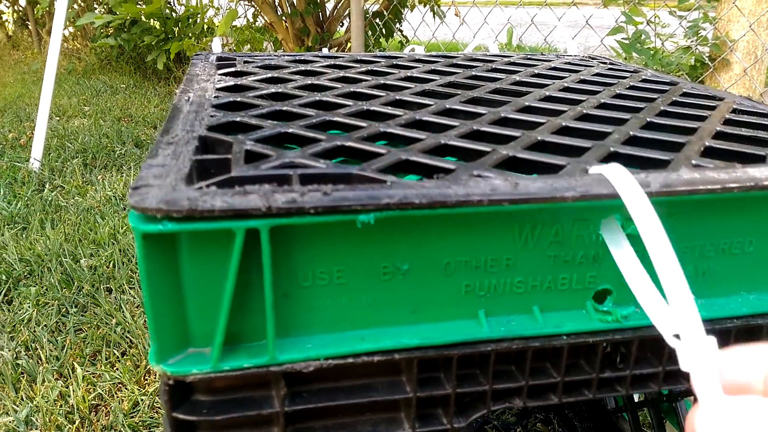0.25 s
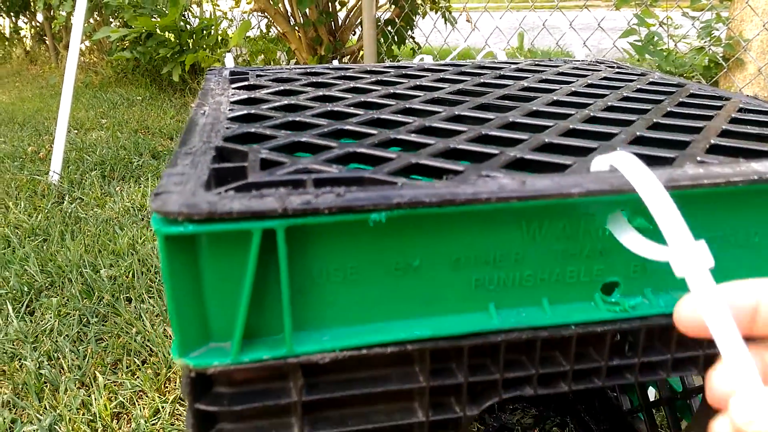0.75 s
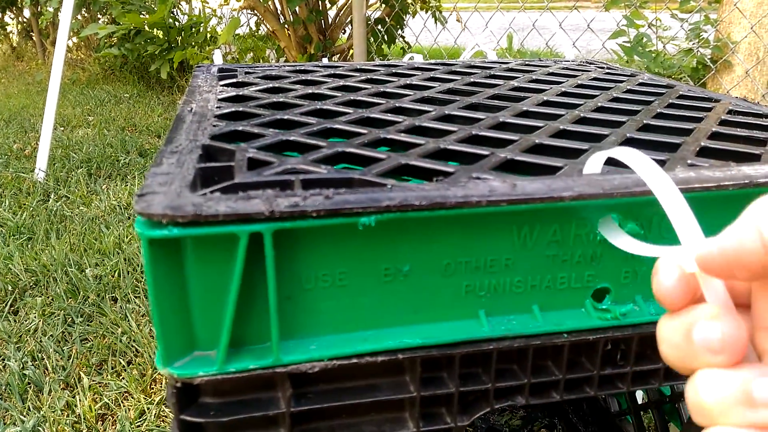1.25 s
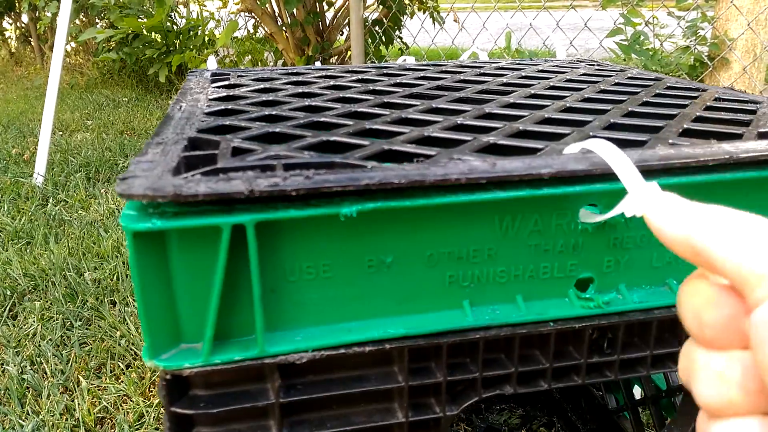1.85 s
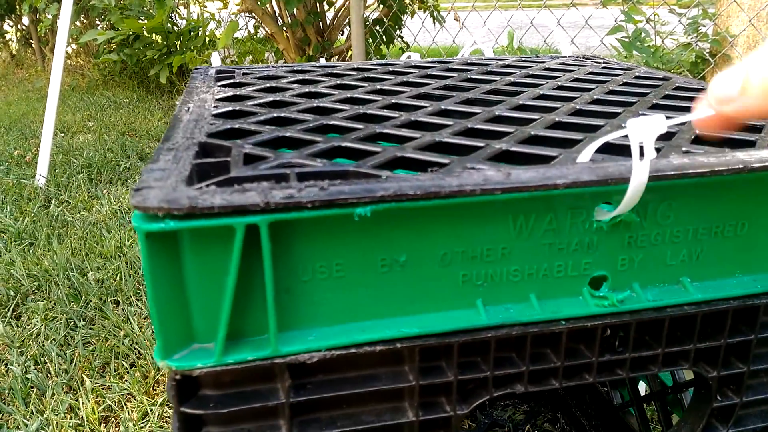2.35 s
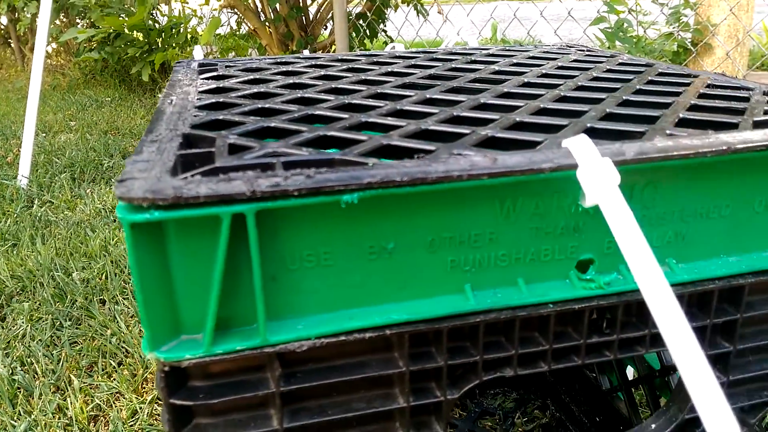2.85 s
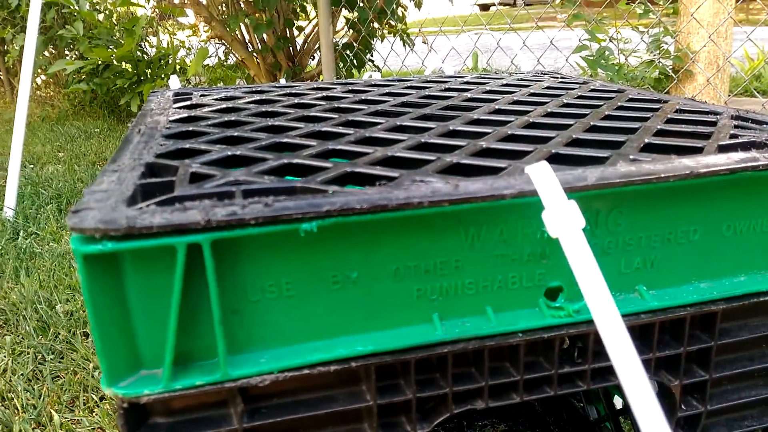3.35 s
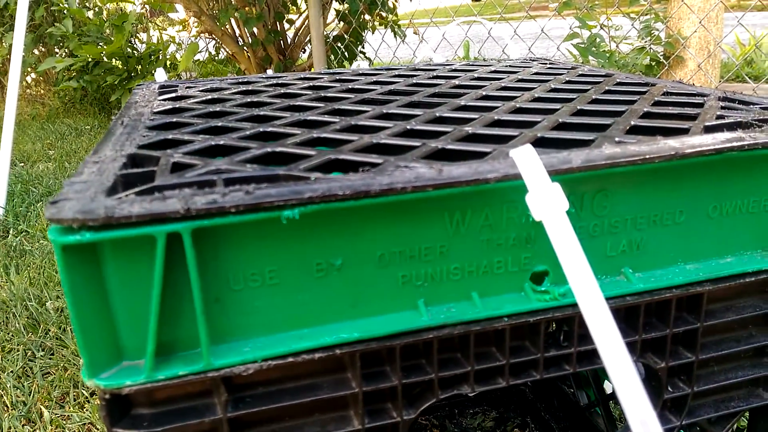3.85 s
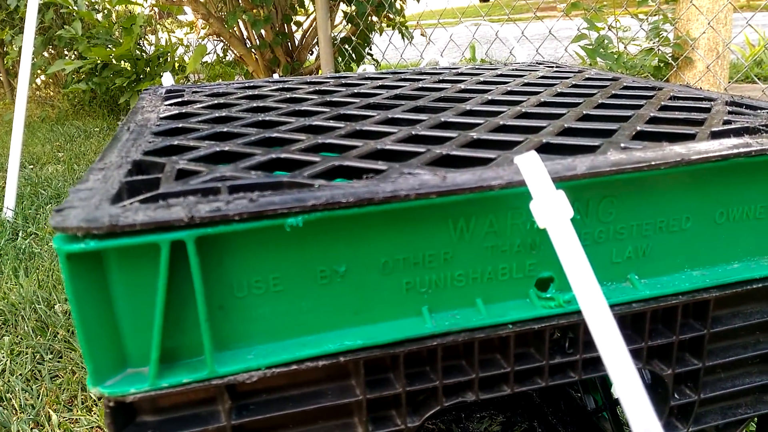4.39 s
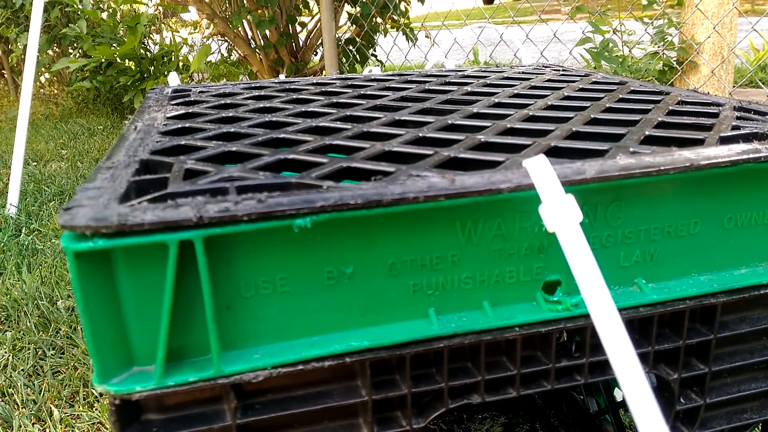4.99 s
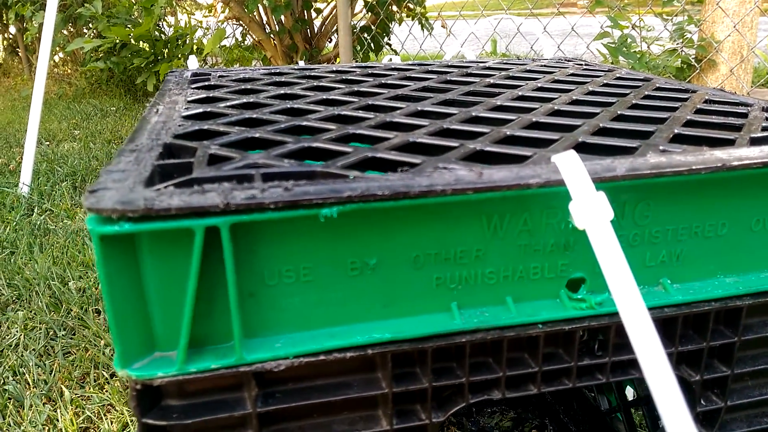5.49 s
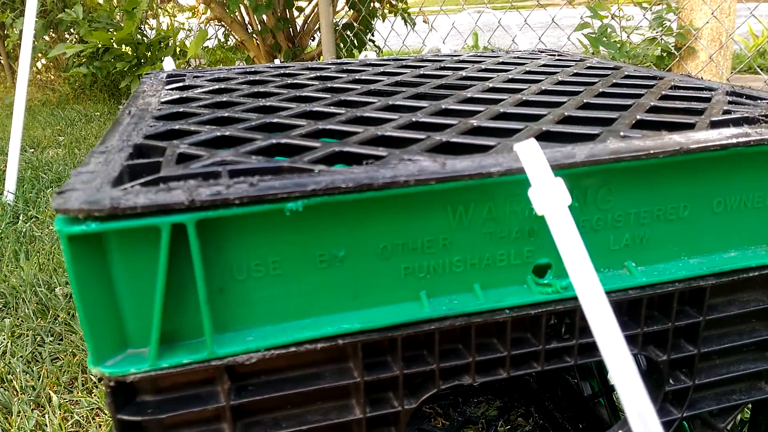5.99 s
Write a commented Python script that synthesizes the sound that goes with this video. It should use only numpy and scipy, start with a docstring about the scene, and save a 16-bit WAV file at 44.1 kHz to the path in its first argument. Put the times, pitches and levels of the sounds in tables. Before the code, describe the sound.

A quiet garden with low, diffuse town noise and a faint wavering motor hum, heard from a handheld phone close to the action. Light finger ticks come at 0.1 s. From 0.36 to 0.67 s a zip tie is tugged three times in quick rattling bursts, bright plastic teeth snapping, the strap buzzing and a crate knocking hollowly, while a thin, hoarse bird whistles a falling phrase until 1.1 s. Soft rubbing fills the gap. From about 1.69 to 2.08 s one long pull ratchets through many teeth, growing fuller and ending in a few loud, spaced clicks. A fainter bird phrase follows at 2.5-3.1 s. Then fingers hiss and tick on the phone, with sharper ticks near 3.75 and 4.14 s, bird notes around 3.9 and 5.5 s, and dull grip scuffs and ticks from 5.4 s to the end past 6 s.

```python
"""In a garden, a nylon zip tie is fastened round two stacked plastic crates, close to a hand-held phone.
Three short tugs and one long pull drag its teeth past the pawl: each tooth snaps in the head (short decaying
sine and a noise crack), shakes the strap (dying noise bands) and knocks the crate (damped sine modes).
Fingers tick, scuff and rustle on the phone in shaped noise, while a small bird whistles falling phrases
in gliding sines over diffuse town noise and a distant motor's wavering tones."""
import sys
import numpy as np
from scipy import signal
from scipy.fft import rfft, irfft
from scipy.io import wavfile
from scipy.ndimage import uniform_filter1d

SR = 44100
rng = np.random.default_rng(int(sys.argv[2]) if len(sys.argv) > 2 else 0)


def master(y):
    """Save y as 16-bit WAV."""
    cut = np.clip(np.atleast_2d(y).T, -1, 1)
    pcm = np.round(cut * 32767)  # scale
    wavfile.write(sys.argv[1], SR, pcm.astype(np.int16))


N = 274743
TIME = np.arange(N) / SR  # whole scene [s]
AGE = np.arange(4096) / SR  # time since a blow [s]

# ringing modes of the crate wall: (frequency [Hz], relative level [dB], t60 [s])
CRATE_MODES = [(278, -15.5, 0.084), (339, -14.5, 0.12), (576, -9.5, 0.05), (637, 1, 0.057),
               (717, -2.5, 0.053), (779, -7.5, 0.062), (903, -11, 0.062), (1116, -4, 0.056),
               (1235, 1, 0.036), (1436, 2, 0.025), (1815, -3.5, 0.042), (2083, -12, 0.034),
               (2530, -1, 0.014)]
# colour of light plastic ticks: (frequency [Hz], relative level per hertz [dB], t60 [s])
TICK_COLOUR = [(2310, -60, 0.013), (3500, -9, 0.11), (4420, -7, 0.062), (6140, 16, 0.013), (7970, 3, 0.023),
               (10500, -9.5, 0.04), (13300, -10, 0.0079), (15520, -7, 0.0095)]


def undb(db):
    """Decibels to gain."""
    return 10 ** (np.asarray(db) / 20)


def rms(x):
    """Root mean square along the last axis."""
    return np.sqrt(np.mean(x ** 2, axis=-1, keepdims=True))


def unit(x):
    """Scale to rms 1."""
    return x / rms(x)


def at(table, hz, column=1):
    """Read a table on a log-frequency axis."""
    rows = np.array(table)
    return np.interp(np.log(hz + 1e-9), np.log(rows[:, 0]), rows[:, column])


def add(out, s, sound):
    """Mix a sound in at time s."""
    i = int(s * SR)
    part = sound[..., :N - i]
    out[..., i:i + part.shape[-1]] += part


def walk(rate):
    """Smooth random wander with spread near 1; rate in new targets per second."""
    k = int(SR / rate)
    steps = np.repeat(rng.standard_normal(N // k + 2), k)
    return 1.5 * uniform_filter1d(uniform_filter1d(steps, k), k)[:N]


def pair(size, alike):
    """Left and right white noise with a given correlation."""
    mid, side = rng.standard_normal((2, size))
    return np.sqrt((1 + alike) / 2) * mid + np.sqrt((1 - alike) / 2) * np.array([side, -side])


def air(level_db=-53, apart_hz=2000, top_hz=10000):
    """Distant town noise, alike on both sides in the bass and diffuse in the treble."""
    # garden air before the treble roll-off: (frequency [Hz], relative level per hertz [dB])
    air_colour = [(25, -41), (40, -26), (52, 3.5), (72, -4), (100, -4), (160, 0.5), (280, -3), (380, -12),
                  (500, -15.5), (800, -16.5), (1200, -19), (2000, -18), (3700, -24.5), (4400, -28),
                  (5200, -23.5), (6500, -24.5), (9000, -33.5)]
    # left minus right: (frequency [Hz], level difference [dB])
    air_side = [(50, 6.8), (300, 7.2), (700, 7), (1800, 10), (3200, 6), (5000, 9), (8000, 4), (12000, 2)]
    hz = np.fft.rfftfreq(N, 1 / SR)
    diffuse = np.clip(0.046 + 3.34 * hz / (hz + apart_hz) * hz / (hz + 200), 0, 1)
    common = np.sqrt(1 - diffuse) * rfft(rng.standard_normal(N))
    spectrum = common + np.sqrt(diffuse) * rfft(pair(N, 0))
    spectrum *= undb(at(air_colour, hz)) / (1 + (hz / top_hz) ** 4) * (hz > 22)
    spectrum[1] *= undb(-at(air_side, hz))
    sound = irfft(spectrum, N)
    swell = undb(0.45 * walk(4))
    return sound / sound[0].std() * undb(level_db) * swell


def hum(waver_db=1.8, drift_rad=0.78):
    """A far motor's tones waver in level and phase on their way through the air."""
    # steady tones of the motor: (frequency [Hz], rms level on the left before wavering [dB])
    motor_tones = [(56.5, -70.5), (117.5, -59.5), (176, -68), (234, -71), (350, -67), (802, -77.5),
                   (856, -79.5)]
    tones = np.zeros(N)
    for hz, db in motor_tones:
        phase = 2 * np.pi * hz * TIME + drift_rad * walk(6)
        tones += undb(db + waver_db * walk(5.07)) * np.sin(phase)
    return np.sqrt(2) * tones * undb([[0], [-6.8]])  # left, right


def garden(x, t60, wet_db, delay_s):
    """Scattered echoes from house wall, fence and bushes: noise dying exponentially after a delay."""
    t = np.arange(SR // 2) / SR
    echoes = rng.standard_normal((2, len(t))) * np.exp(-np.log(1000) * t / t60) * (t > delay_s)
    echoes *= undb(wet_db) / np.linalg.norm(echoes, axis=1, keepdims=True)
    return signal.fftconvolve(x[None], echoes, axes=1)[:, :N] * undb([[0], [-7]])


def bird(level_db=5):
    """Thin, hoarse whistles that each hook upward and swell onto a held pitch."""
    # notes in phrases that open high and fall: (time [s], held pitch [Hz], relative level [dB],
    # upward hook [share of pitch], final sink [share of pitch])
    notes = [(0.58, 7400, -61, .06, .03), (0.692, 6820, -52, .13, .01), (0.794, 6550, -53, .15, 0),
             (0.883, 6130, -53.5, .17, 0), (0.98, 5450, -58.5, .14, .03), (1.096, 5850, -58, .19, .07),
             (2.53, 7750, -67.5, .1, .02), (2.645, 7260, -65, .15, 0), (2.74, 7190, -64, .19, .01),
             (2.835, 7120, -63.5, .19, .01), (2.93, 7050, -64, .19, .01), (3.025, 6990, -64, .19, .01),
             (3.85, 7750, -65, .06, .08), (3.972, 6520, -54.5, .1, 0), (5.41, 7750, -65, .06, .08),
             (5.52, 6850, -56, .12, .02), (5.636, 6730, -56.5, .12, .01)]
    out = np.zeros(N)
    hoarse = 1 + 0.014 * walk(700) + 0.006 * walk(90)
    for s, top_hz, db, hook, sink in notes:
        length_s = 0.049 * (top_hz / 7000) ** 2  # lower notes are shorter
        t = np.arange(int(length_s * SR)) / SR
        u = t / length_s
        glide = 1 - hook * np.exp(-t / 0.011) - sink * u ** 2
        hz = top_hz * glide * hoarse[int(s * SR):][:len(t)]
        swell = 1.5 * np.sqrt(u * np.sin(np.pi * u))
        add(out, s, undb(db + level_db) * swell * np.sin(2 * np.pi * np.cumsum(hz) / SR))
    return out


def swells(table):
    """Summed power of strokes that each swell and fade."""
    return sum(undb(2 * db) * np.exp(-np.pi * ((TIME - s) / length) ** 2) for s, length, db in table)


def sliding(grip_db=-84.5):
    """How strongly the fingers rub: the slides rise over the resting grip."""
    # fingers sliding on the phone: (middle [s], length [s], relative level [dB])
    slides = [(0.14, 0.062, -70), (0.597, 0.32, -66.5), (0.887, 0.2, -63.5), (1.26, 0.04, -64.5),
              (2.2, 0.15, -71.5), (2.63, 0.075, -65.5), (2.92, 0.21, -70), (3.46, 0.068, -62.5),
              (3.85, 0.22, -63.5), (4.32, 0.3, -62.5), (4.7, 0.12, -61.5), (5.2, 0.28, -69.5),
              (5.616, 0.34, -61), (6.02, 0.083, -63.5), (6.195, 0.13, -65)]
    return np.sqrt(swells(slides) + undb(2 * grip_db))


def fingers(rub_db=0.5, flutter_db=2.5, right_db=-2):
    """Skin sliding on plastic: a fluttering hiss of tiny slips of uneven size."""
    # colour of the rubbing: (frequency [Hz], relative level per hertz [dB])
    rub_colour = [(1500, -23), (2800, 1), (4400, -7), (6500, 11.5), (8000, 5), (10000, -2), (13000, -12),
                  (15000, -19)]
    sizes_db = 4 * np.minimum(rng.exponential(size=N // 64 + 1), 5)
    slips = np.repeat(undb(sizes_db), 64)[:N]  # each slip lasts 64 samples
    spectrum = rfft(pair(N, 0.14) * slips)
    hiss = irfft(spectrum * undb(at(rub_colour, np.fft.rfftfreq(N, 1 / SR))), N)
    return unit(hiss) * sliding() * undb(rub_db + flutter_db * walk(44)) * undb([[0], [right_db]])


def scuffs(centre_hz=2900, octaves=0.61, flutter_db=4.5, right_db=-3):
    """The shifting grip rubs in a lower, narrower band than the fingertips."""
    # the grip shifting with a dull scuff: (middle [s], length [s], level before flutter [dB])
    shifts = [(5.46, .15, -71.5), (5.69, 0.09, -64), (6.01, 0.069, -64)]
    away = np.log2((np.fft.rfftfreq(N, 1 / SR) + 1) / centre_hz) / octaves
    rasp = unit(irfft(rfft(pair(N, 0.18)) * np.exp(-away ** 2), N))
    return rasp * np.sqrt(swells(shifts)) * undb(flutter_db * walk(90)) * undb([[0], [right_db]])


def lag(hz, travel_s):
    """Bending waves run slower the lower they are: how far a pitch trails the treble."""
    return abs(travel_s) * np.maximum(np.sqrt(13000 / hz) - 1, 0)


def burst(colour, noise, treble_db=0, scale=1, treble_hz=7500, travel_s=0, body_db=0):
    """Dense, quickly dying modes: noise bands, each with its own decay; scale moves them all in pitch."""
    # left minus right: (frequency [Hz], level difference [dB])
    burst_side = [(2000, 8), (3200, 5), (5500, 9), (7500, 3), (9000, 0), (12000, 1)]
    edges = np.geomspace(colour[0][0], colour[-1][0], num=17)
    hz = np.sqrt(edges[1:] * edges[:-1])
    bins = np.fft.rfftfreq(len(AGE), 1 / SR) / scale
    masks = (bins >= edges[:-1, None]) & (bins < edges[1:, None])
    bands = unit(irfft(rfft(noise)[:, None] * masks))
    gain = undb(at(colour, hz)) * np.sqrt(np.diff(edges))
    gain = gain / np.linalg.norm(gain)
    gain = gain * undb(treble_db * np.clip(np.log2(hz / treble_hz), 0, 1))
    gain = gain * undb(body_db * (hz < 3000))
    age = np.maximum(AGE - lag(hz, travel_s)[:, None], 0)
    decay = np.exp(-np.log(1000) * age / at(colour, hz, column=2)[:, None])
    fade = gain[:, None] * decay * (1 - np.exp(-age / 0.00034))
    # each band gets the energy that the blow gives it, however its modes happen to add up
    bands = unit(bands * fade) * rms(fade)
    bands[1] *= undb(-at(burst_side, hz * scale))[:, None]
    return bands.sum(axis=1)


def creaks(per_s=5.2):
    """Now and then the sliding skin catches and lets go with a tiny tick."""
    out, effort = np.zeros((2, N)), sliding()
    chance = rng.random((256, 2))
    for when, size in chance[:int(per_s * N / SR)]:
        gain = effort[int(when * N)] * undb(-7 + 10 * size)  # -7 to +3 dB against the slide
        add(out, when * N / SR, gain * burst(TICK_COLOUR, pair(len(AGE), 0.12)))
    return out


def handling(tick_db=5, knock_db=4, knock_hz=1500):
    """Light plastic ticks, each with a hollow knock of its own strength and pitch."""
    # handling ticks: (time [s], relative tick level [dB], relative knock level [dB], knock pitch [Hz])
    touches = [(0.1002, -42, -55.5, 1340), (0.1202, -38.5, -53.5, 1280), (0.3421, -45.5, -44.5, 854),
               (2.243, -48.5, -53.5, 3430), (2.2757, -54.5, -70, 3000), (2.6538, -57, -49, 983),
               (3.7538, -31.5, -48, 2200), (3.788, -45.5, -54, 2060), (4.1430, -32.5, -43, 1943),
               (4.27, -51, -41, 1486), (4.305, -54, -70, 3000), (4.345, -51, -73, 3000),
               (4.414, -55, -63, 3000), (4.74, -51, -66, 3030), (5.305, -58, -72, 3000),
               (5.359, -54, -72, 3000), (5.825, -55, -66, 3000), (5.6334, -40, -62, 2940),
               (5.683, -39, -50, 3400), (6.185, -37.5, -45, 3400), (6.208, -45.5, -59, 3000)]
    # colour of the hollow knock at knock_hz: (frequency [Hz], relative level per hertz [dB], t60 [s])
    knock_colour = [(501, -22, 0.088), (850, -14, 0.087), (1320, -0.5, 0.032), (1710, -4.5, 0.04),
                    (2220, -8.5, 0.027), (2822, -10, 0.019)]
    out = np.zeros((2, N))
    for s, tick, knock, hz in touches:
        add(out, s, undb(tick + tick_db) * burst(TICK_COLOUR, pair(len(AGE), 0.054)))
        hollow = burst(knock_colour, pair(len(AGE), 0.39), scale=hz / knock_hz)
        add(out, s, undb(knock + knock_db) * hollow)
    return out


def crate(low_db, high_db, phase, scatter_db=2, detune=0.034, build_s=0.00091, right_db=-7.5, right_tilt_db=-5):
    """The strap's jerk rings the crate wall, with low and high modes at their own levels."""
    hz, db, t60 = np.transpose(CRATE_MODES)[:, :, None]
    size, shift, turn = rng.standard_normal((3, len(CRATE_MODES), 1))
    db = db + np.where(hz < 1000, low_db, high_db)
    fade = undb(db) * np.exp(-np.log(1000) * AGE / t60)
    tones = np.sin(2 * np.pi * hz * (1 + detune * shift) * AGE + phase + turn)
    modes = fade * undb(scatter_db * size) * tones
    modes[1] *= undb(right_db + right_tilt_db * np.clip(np.log2(hz / 650), 0, 1))
    ring = modes.sum(axis=1)
    # the force of the jerk sets the energy; chance only shares it among the modes
    ring *= np.sqrt(np.sum(fade ** 2) / 2 / np.sum(ring[0] ** 2))
    return ring * (1 - np.exp(-AGE / build_s))


def snap(hz, rise_s, right_db=-13, crack_db=-17, crack_hz=7000, crack_right_db=-3, crack_s=0.00031):
    """The pawl drops behind a tooth: a brief bright crack, and the head rings for a few cycles."""
    u, v = AGE / rise_s, AGE / crack_s
    ring = np.sin(2 * np.pi * (hz * AGE + rng.random((2, 1)))) * undb([[0], [right_db]])
    band = signal.butter(4, [crack_hz, 11300], "band", fs=SR, output="sos")
    crack = unit(signal.sosfilt(band, pair(len(AGE), 0.22)))
    crack = crack * undb([[crack_db], [crack_db + crack_right_db]])
    return ring * (u * np.exp(1 - u)) ** 2 + crack * (v * np.exp(1 - v)) ** 2


def zip_tie(snap_db=1.5, strap_db=3, crate_db=4, same=0.6, alike=0.097, apart_hz=2200, sharpest_s=0.0004):
    """Each tooth sounds head, strap and crate; part of the strap's ring repeats from tooth to tooth."""
    # teeth passing the pawl: (time [s], relative head snap level [dB], head pitch [Hz],
    # relative strap level [dB], strap treble lift [dB], relative crate level below 1 kHz [dB],
    # relative crate level above 1 kHz [dB])
    teeth = [(0.3632, -18, 5700, -29.5, 5, -40, -37), (0.3690, -17.5, 5700, -29, 1, -43.5, -42),
             (0.3778, -20, 5800, -26.5, 7, -46, -42), (0.3838, -19.5, 6500, -26, 4, -40, -39),
             (0.3910, -25, 5400, -32, 1, -45, -48), (0.3959, -20, 5600, -26.5, -3, -41.5, -44),
             (0.403, -25, 6100, -25.5, 0, -48, -44), (0.484, -18, 5700, -25.5, 8, -41.5, -39.5),
             (0.4908, -24, 6200, -28, 1, -45, -42), (0.4969, -25, 6200, -23, 6, -42, -43),
             (0.5007, -24, 5800, -26, 2, -42, -47), (0.5049, -27, 5700, -28, 4, -44, -46),
             (0.5098, -28, 5700, -22, 1, -46, -42), (0.5136, -18, 5600, -30, 5, -35.5, -49),
             (0.5169, -21, 5600, -31, 9, -36.5, -42.5), (0.5208, -21, 5200, -25.5, 0, -41, -37.5),
             (0.5240, -16, 5400, -30.5, 1, -36.5, -43), (0.6573, -25, 5600, -25.5, -6, -31, -43),
             (0.6603, -21.5, 5600, -31, -12, -40, -37), (0.6713, -40, 5800, -28.5, -9, -43, -47),
             (1.6860, -40, 5600, -39, 5, -64, -53), (1.7045, -33, 5300, -33, 4, -56, -54),
             (1.7177, -21.5, 5200, -34.5, -8, -60, -50), (1.7279, -20, 5230, -30, -9, -62, -50),
             (1.7379, -18.5, 5300, -31.5, -8, -60, -54), (1.7506, -12, 5500, -32.5, 8, -65, -42.5),
             (1.7656, -14, 5550, -34, -5, -53, -40), (1.7872, -15, 5580, -34.5, -4, -56, -48),
             (1.8055, -21, 5480, -31, -4, -54, -53), (1.8197, -13.5, 5520, -30.5, -10, -57, -50),
             (1.8289, -20.5, 5750, -28, -3, -57, -52), (1.8380, -26, 5530, -28.5, -4, -53, -53),
             (1.8464, -20, 5850, -30.5, -5, -48, -55), (1.8571, -27, 5700, -28, -5, -57, -45),
             (1.8721, -19, 5580, -25, -14, -50, -46), (1.8917, -17, 5560, -28, -9.5, -43.5, -42),
             (1.9142, -18.5, 5560, -26, -11, -46, -41.5), (1.9355, -14, 5530, -27.5, -6, -46, -45),
             (1.9484, -15.5, 5460, -27.5, 1, -45, -48), (1.9595, -14, 5410, -29, 2, -45, -43),
             (1.9686, -21.5, 5500, -25, 3, -43, -43), (1.9785, -17, 5540, -27, -8, -41, -35),
             (1.9906, -20.5, 5640, -25.5, -2, -42, -34.5), (2.0052, -15, 5480, -28, -1, -39.5, -30.5),
             (2.0227, -11.5, 6000, -25, 0, -45, -32), (2.0434, -7.5, 6170, -24, -2, -47.5, -35),
             (2.0822, -7.5, 6130, -25, 0, -43.5, -35)]
    # the loop as it tightens: (time [s], travel time of a bending wave at 13 kHz [s],
    # rise of the snap [s], strap body below 3 kHz [dB])
    loop_states = [(0.45, 0.0019, 0.0006, -5), (1.75, 0.00051, 0.00043, 4.5), (1.87, 0.0005, 0.00048, 3.5),
                   (1.96, 0.0004, 0.00046, -1.5), (2.06, 0.0003, 0.00055, -1.5)]
    # colour of the shaken strap: (frequency [Hz], relative level per hertz [dB], t60 [s])
    strap_colour = [(1502, -14.5, 0.054), (2600, -4, 0.03), (3660, -4.5, 0.033), (4200, 1, 0.036),
                    (5100, 4, 0.02), (6380, -1, 0.029), (7130, 0.5, 0.023), (8530, -6.5, 0.016),
                    (10300, -13.5, 0.019), (12300, -9, 0.014), (14000, -17, .008), (15250, -18, .007)]
    out = np.zeros((2, N))
    body = pair(len(AGE), alike)
    # the higher a crate mode, the more its phase differs between the two microphones
    apart = rng.standard_normal((2, len(CRATE_MODES), 1)) * np.array(CRATE_MODES)[:, :1] / apart_hz
    phase = 2 * np.pi * rng.random((len(CRATE_MODES), 1)) + apart
    when, *loop = np.transpose(loop_states)
    for s, head, hz, strap, treble, low, high in teeth:
        travel_s, rise_s, body_db = (np.interp(s, when, column) for column in loop)
        shake = np.sqrt(same) * body + np.sqrt(1 - same) * pair(len(AGE), alike)
        # a softer snap spreads the same energy over a longer time
        head_gain = undb(head + snap_db) * np.sqrt(sharpest_s / rise_s)
        add(out, s + lag(hz, travel_s), head_gain * snap(hz, rise_s))
        strap_ring = burst(strap_colour, shake, treble, travel_s=travel_s, body_db=body_db)
        add(out, s, undb(strap + strap_db) * strap_ring)
        add(out, s, undb(crate_db) * crate(low, high, phase))
    return out


def scene():
    """The tie is near and almost dry, its echoes dulled by the lawn; the bird is far off among the echoes."""
    tie, song = zip_tie(), bird()
    dull = signal.sosfilt(signal.butter(2, 7500, fs=SR, output="sos"), tie[0])
    tie_echoes = garden(dull, t60=0.31, wet_db=-28.5, delay_s=0.0057)
    hand = handling() + fingers() + creaks() + scuffs()
    # moving leaves smear the pitch of the bird's echoes
    song_echoes = garden(song * np.cos(0.7 * walk(900)), t60=0.55, wet_db=1, delay_s=0.008)
    far = song * undb([[-2.5], [-8.5]]) + song_echoes
    return air() + hum() + far + hand + tie + tie_echoes


def record(dry):
    """Low-pass filters soften the treble above 14 kHz and remove the top above 16.2 kHz."""
    soft = signal.sosfilt(signal.butter(6, 14000, fs=SR, output="sos"), dry)
    return signal.sosfilt(signal.ellip(8, 0.2, 70, 16200, fs=SR, output="sos"), soft)


dry = scene()
out = record(dry)
master(out)
```